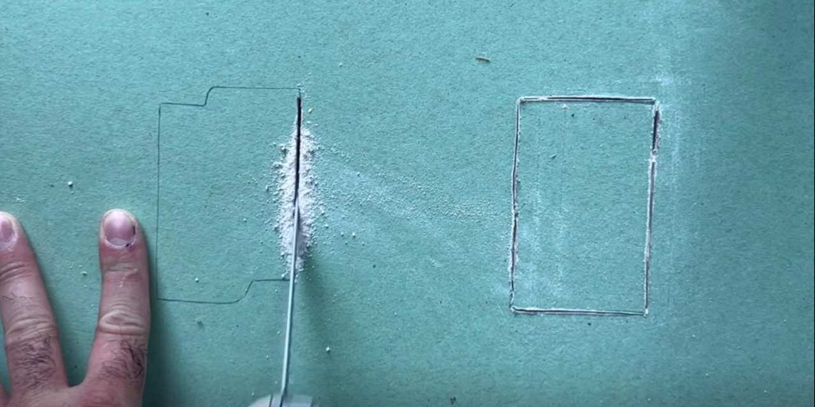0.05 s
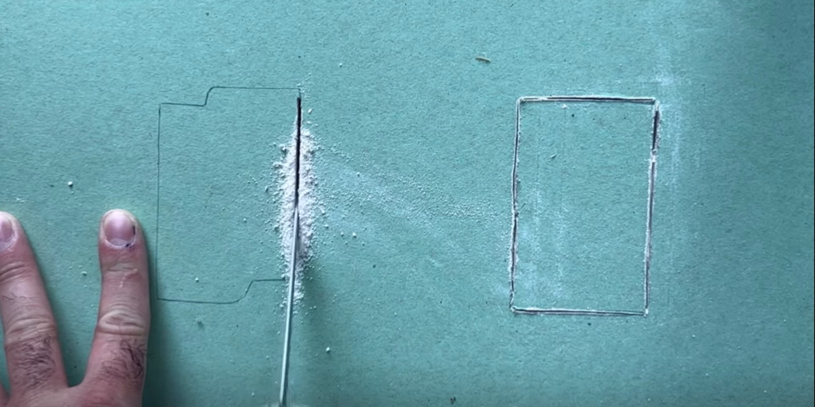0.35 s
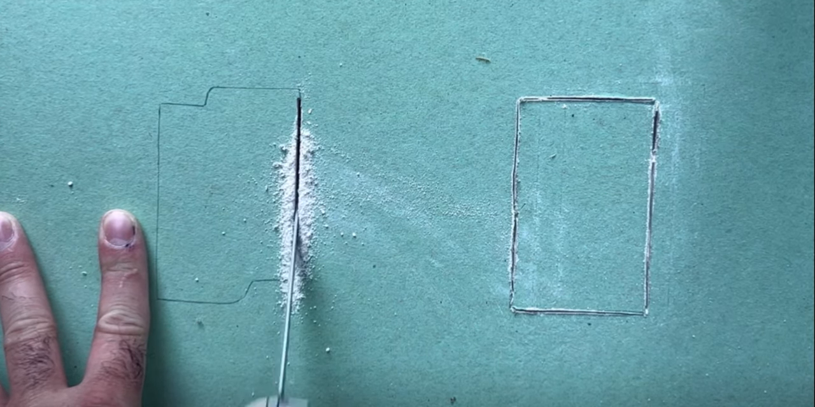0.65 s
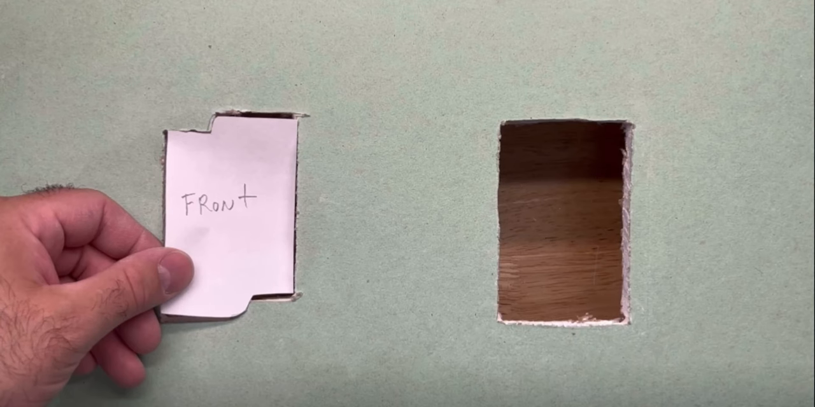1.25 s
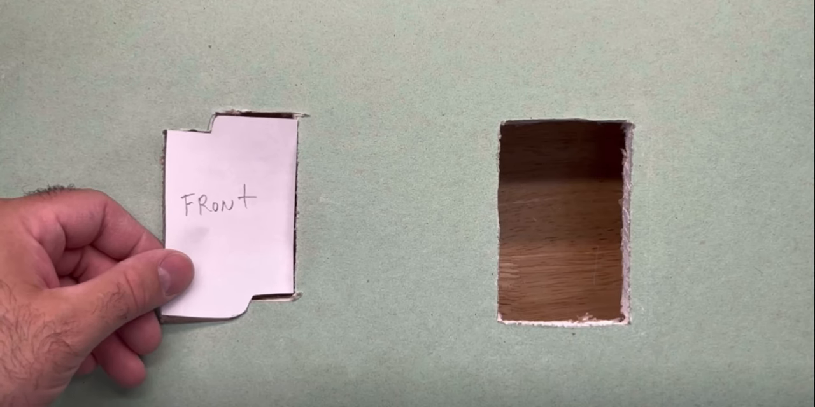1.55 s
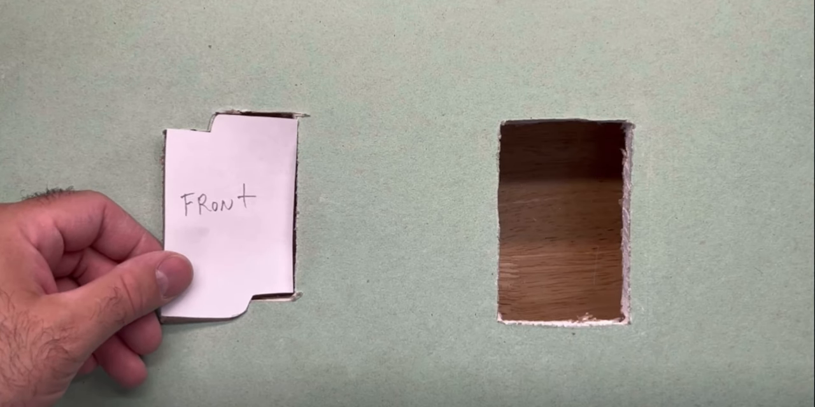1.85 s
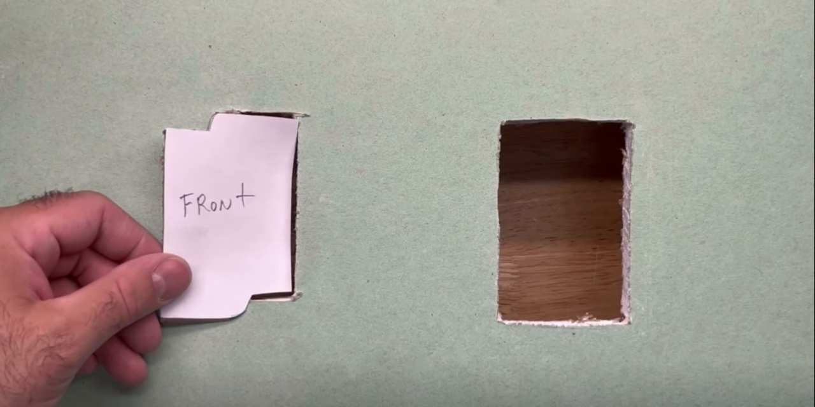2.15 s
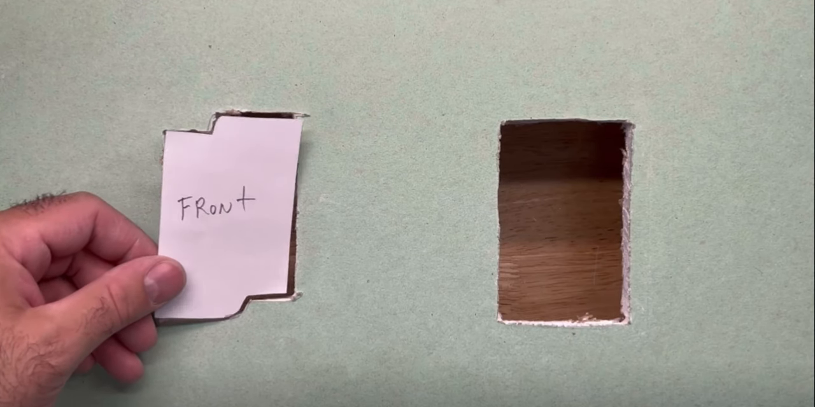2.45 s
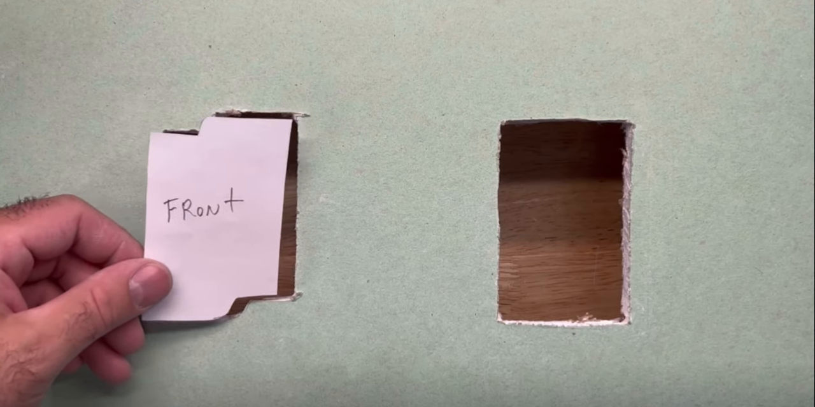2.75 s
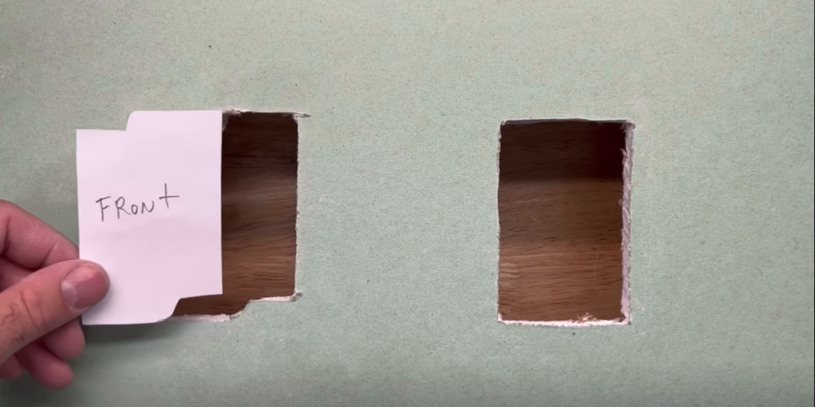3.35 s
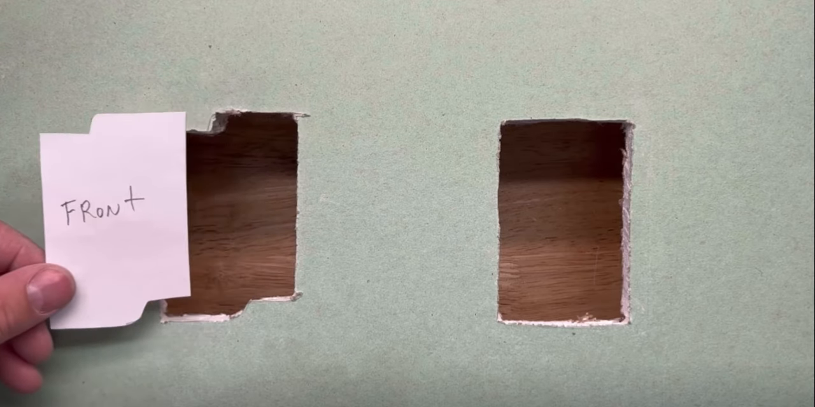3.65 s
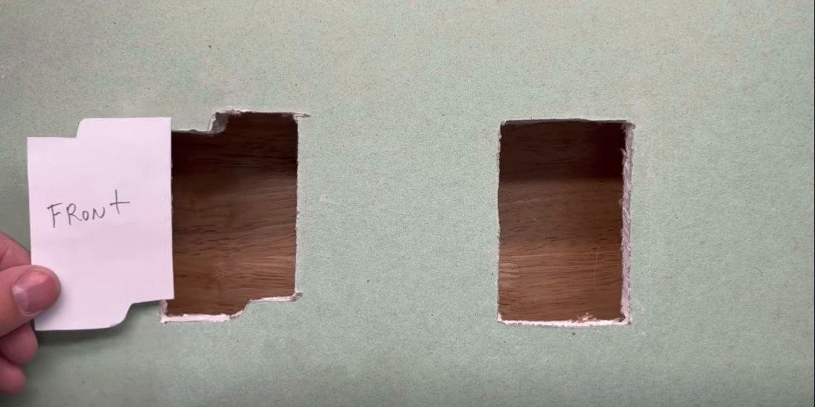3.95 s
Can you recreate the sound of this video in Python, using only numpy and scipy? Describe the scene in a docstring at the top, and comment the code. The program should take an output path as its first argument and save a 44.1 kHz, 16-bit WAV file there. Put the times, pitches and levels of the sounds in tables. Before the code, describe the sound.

A hand saw rasps through drywall in quick strokes, then stops, leaving faint paper rustles.

```python
"""A jab saw rasps through drywall in quick strokes, close by, hard on the push, light on the pull. Its teeth
crush gypsum, ring the blade and shake the board; now and then one snags and tears loose. The sawing cuts off
and the scene changes to a quiet room's low rush, hum and faint hiss. A finger bumps a paper template, which
rustles against the wall in clumps of tiny snaps."""
import sys
import numpy as np
from scipy import signal
from scipy.fft import rfft, irfft
from scipy.io import wavfile
from scipy.ndimage import uniform_filter1d

SR = 44100
rng = np.random.default_rng(int(sys.argv[2]) if len(sys.argv) > 2 else 0)


def persist_wave(psi):
    """Save psi, clipped to +-1, as 16-bit WAV."""
    counts = np.round(np.clip(psi, -1, 1) * 32767).astype(np.int16)
    wavfile.write(sys.argv[1], SR, np.atleast_2d(counts).T)


N = 176400
T = np.arange(N) / SR

# a pull, a little catch, then hard pushes and light pulls in turn
# (start [s], peak [s], end [s], rasp [dB], shake [dB], peakedness [-])
STROKES = [(-.04, 0.023, 0.069, -38.5, -23, 1.1), (.076, .088, 0.11, -45.5, -27.5, 0.66),
           (.11, 0.157, .23, -32, -16, 0.75), (.266, .338, .38, -40, -23.5, 0.49),
           (.387, 0.489, .533, -32, -14, 0.87), (.568, 0.636, .692, -43, -25.5, 0.46),
           (.7, .787, 0.82, -31.5, -15, 1.243), (.857, .925, 0.97, -40, -22, 0.96)]
# crushed gypsum (frequency [Hz], density [dB])
GYPSUM_SPECTRUM = [(20, -20), (50, -4), (90, 1), (300, 10), (420, 4.5), (680, 1.5), (880, 7.5), (950, -3),
                   (1120, 2.5), (1270, -5), (1800, 0.5), (2250, 2.5), (2480, -8), (2750, -3.5),
                   (3300, -4.5), (3780, -5), (3950, -14), (4150, -7), (5100, -12), (5650, -17.5),
                   (7500, -13.5), (9000, -16), (12000, -22), (15500, -20)]
# blade and board resonances (frequency [Hz], level [dB], t60 [s])
BLADE_MODES = [(1474, -3, .09), (1686, -7.5, .08), (1890, -7, 0.062), (2099.4, 2, 0.055), (2366, 0.5, .06),
               (2580, -1, .07), (2760, 2, .07), (2844, -0.5, .08), (3730, 0, 0.025), (4180, -2, 0.024),
               (4366, -4.5, 0.044), (5080, -8.5, .04), (7730, -10.5, 0.016), (9503, -6.5, .012)]
BOARD_MODES = [(120, -4.5, 0.13), (153, -1, 0.06), (180, 3, .09), (219, 1.5, 0.088), (237, -4, 0.087),
               (304.3, 0.5, 0.18), (313, -12.5, .07), (467, -20, .16), (541, -10.5, 0.12),
               (800, -19, 0.073), (857, -20.5, .16), (967, -22.5, 0.15), (1059, -14.5, .16)]
# handle rumble (frequency [Hz], density [dB])
RUMBLE_SPECTRUM = [(20, -34), (50, -16.5), (92, -17), (108, -9.5), (123, 3), (145, -4), (200, -15),
                   (400, -31), (2000, -68)]
# handle rumble (time [s], level [dB])
RUMBLE_ENVELOPE = [(0, -26.5), (.09, -32.5), (.22, -25), (.26, -44.5), (.31, -31.5), (.55, -30),
                   (.68, -26.5), (.71, -35), (.83, -29.5), (.86, -35.5)]
# teeth tearing loose (time [s], level [dB])
SNAGS = [(.146, -9.5), (.164, -10), (.205, -6.5), (.337, -18.5), (.465, -6), (.491, -6), (.503, -9),
         (.75, -15), (.782, -8.5), (.796, -7), (.893, -15)]
# room rush and microphone hiss (frequency [Hz], density [dB])
RUSH_SPECTRUM = [(20, -14.5), (35, -7.5), (52, 4.5), (72, 0.5), (100, 3), (135, -7.5), (200, -10),
                 (380, -15), (600, -24), (900, -20.5), (1400, -37), (2500, -50), (15000, -80.5)]
HISS_SPECTRUM = [(1000, 0.5), (2500, -1.5), (6000, -5), (10000, -11.5), (15000, -15.5)]
# room rush (time [s], level [dB])
RUSH_ENVELOPE = [(.95, -65), (1.2, -61), (1.55, -59), (3, -59), (4, -58.5)]
# finger bumps (time [s], level [dB])
BUMPS = [(1.455, -56), (1.49, -60), (2.195, -49), (2.226, -42.5), (2.24, -51), (2.279, -36), (2.293, -60),
         (2.314, -44), (2.331, -69), (3.309, -61.5)]
# resonances under the finger (frequency [Hz], level [dB], t60 [s])
BUMP_MODES = [(324, -14.5, 0.063), (380.8, -16, .08), (436.7, 0, 0.064), (491.6, 2.5, 0.085),
              (564, -10.5, 0.029), (713, -6, .04), (886.3, -26, .03)]
# paper crinkles (time [s], level [dB], decay [s])
CRINKLES = [(1.472, -57.5, .016), (1.486, -50, 0.009), (1.51, -67, .015), (1.54, -62, 0.017),
            (1.553, -67, 0.0082), (1.65, -75.5, 0.018), (1.706, -70, 0.05), (1.764, -56.5, 0.0089),
            (2.176, -70, .015), (2.19, -55.5, 0.02), (2.221, -45, 0.008), (2.268, -63.5, 0.022)]
# paper snaps (frequency [Hz], density [dB])
PAPER_SPECTRUM = [(60, -10), (250, -5), (450, 6), (700, 0), (1000, 2.5), (1400, -7.5), (1900, -5.5),
                  (2250, -2), (2700, -8.5), (4500, -11), (5100, -7), (5700, -11.5), (7300, -16.5),
                  (10000, -15.5), (15500, -23)]
# room decay (frequency [Hz], t60 [s])
ROOM_T60 = [(100, 0.15), (500, 0.17), (2000, .16), (6000, 0.084), (15000, 0.027)]
# left microphone's lead (frequency [Hz], phase [rad])
LEFT_LEAD = [(50, 0), (150, .06), (300, .14), (750, .35), (1100, .55), (1600, 2.1), (1850, .05), (5200, 0),
             (7200, -1.4), (8000, -3.14), (8800, -3.2), (11000, -6.28), (13000, -6.28), (14800, -9.4)]
# left over right (frequency [Hz], level [dB])
BALANCE = [(50, .2), (300, 1.2), (750, 0), (1100, 2), (1300, 0), (1800, -4), (2500, 0)]
# diffuse over shared sound at the microphones (frequency [Hz], level [dB])
SAW_DIFFUSE = [(50, -32), (400, -28), (750, -16), (1100, -14), (1300, -4), (1600, -6), (1850, -13),
               (2500, -22), (2900, -17), (4000, -34), (5200, -34), (5800, -7), (7400, -8), (8100, -28),
               (8700, -26), (9500, -5), (10500, -6), (11100, -30), (13000, -30), (13600, -3), (14800, -20)]
QUIET_DIFFUSE = [(90, -18), (200, -11), (400, -7.5), (700, -3.5), (1400, 3), (2100, -6.5), (3500, -3),
                 (7200, -2), (8100, -18), (8800, -14), (9800, -0.5), (11200, -14.5), (12900, -14.5),
                 (13700, -1.5), (14800, -11.5)]


def amp(db):
    """dB to gain."""
    return 10 ** (np.asarray(db) / 20)


def unit_rms(x):
    """Scales to rms 1."""
    return x / np.sqrt(np.mean(x ** 2) + 1e-20)


def lookup(table, hz):
    """Interpolates over log frequency."""
    table_hz, values = np.transpose(table)
    return np.interp(np.log(hz + 1), np.log(table_hz + 1), values)


def colour(x, spectrum):
    """Applies a spectrum; rms 1."""
    return unit_rms(irfft(rfft(x) * amp(lookup(spectrum, np.fft.rfftfreq(N, 1 / SR))), N))


def ring(x, modes):
    """Drives damped modes of total energy 1."""
    t = T[:SR // 2]
    response = sum(amp(db) * np.exp(-np.log(1000) * t / t60_s) * np.cos(2 * np.pi * hz * t)
                   for hz, db, t60_s in modes)
    return signal.fftconvolve(x, response / np.linalg.norm(response))[:N]


def fractures(per_s, spread_db=1.5):
    """Random tiny snaps of uneven size; rms 1."""
    snaps = (rng.random(N) < per_s / SR) * rng.choice([-1, 1], N)
    return unit_rms(snaps * amp(spread_db * np.minimum(rng.exponential(1, N), 4)))


def knocks(events, modes, contact_s):
    """Short pushes on a ringing body, each peaking at its level."""
    u = T / contact_s
    blow = ring(u * np.exp(-2 * u), modes)[:SR // 2]
    out = np.zeros(N)
    for time_s, db in events:
        span = out[round(time_s * SR):][:len(blow)]
        span += amp(db) * blow[:len(span)] / abs(blow).max()
    return out


def reverb(x):
    """Small-room reflections; treble dies first."""
    hz, t, noise = signal.stft(rng.standard_normal(SR // 2), SR, nperseg=256)
    decay = np.exp(-np.log(1000) * t / lookup(ROOM_T60, hz)[:, None])
    tail = signal.istft(noise * decay, SR, nperseg=256)[1]
    return signal.fftconvolve(x, tail / np.linalg.norm(tail))[:N]


def strokes():
    """Each stroke speeds up and slows; rasp and shake follow."""
    speed, rasp, shake = np.zeros((3, N))
    for start_s, peak_s, end_s, rasp_db, shake_db, peakedness in STROKES:
        arch = np.sin(np.pi / 2 * np.interp(T, [start_s, peak_s, end_s], [0, 1, 0]))
        speed += arch
        rasp += amp(rasp_db) * arch ** peakedness
        shake += amp(shake_db) * arch ** (1.5 * peakedness)
    return speed, rasp, shake


def tooth_hits(speed, nominal_hz=480, jitter=.6, spread_db=4):
    """One uneven impulse a tooth, denser at speed."""
    wobble = unit_rms(uniform_filter1d(rng.standard_normal(N), size=100))
    rate_hz = nominal_hz * (.5 + .5 * speed) * np.exp(jitter * wobble)
    hits = np.diff(np.floor(np.cumsum(rate_hz) / SR), prepend=0)
    return hits * amp(spread_db * rng.uniform(-1, 1, N))


def blade_slide(x, depth_db=3, width_hz=70, life_s=.018):
    """Narrow resonances in the rasp come and go as the blade slides."""
    hz, t, z = signal.stft(x, SR, nperseg=512, noverlap=384)
    across, along = np.fft.fftfreq(len(hz), hz[1])[:, None], np.fft.fftfreq(len(t), t[1])
    blur = np.exp(-2 * np.pi ** 2 * ((across * width_hz) ** 2 + (along * life_s) ** 2))
    patches = unit_rms(np.fft.ifft2(np.fft.fft2(rng.standard_normal(z.shape)) * blur).real)
    gain_db = depth_db * patches / np.sqrt(1 + (hz[:, None] / 9000) ** 2)
    return unit_rms(signal.istft(z * amp(gain_db), SR, nperseg=512, noverlap=384)[1][:N])


def gypsum_crunch(teeth, rasp, bite_s=.0015, bite_share=.36, snag_decay_s=.0022, idle_db=-57):
    """Teeth crush grit, which rings the blade; snags add bursts."""
    bites = unit_rms(signal.lfilter([1], [1, -np.exp(-1 / (bite_s * SR))], teeth))
    grit = unit_rms(fractures(per_s=14000) * (1 - bite_share + bite_share * bites))
    snags = sum(amp(db - 30.5) * (T > time_s) * np.exp(-abs(T - time_s) / snag_decay_s)
                for time_s, db in SNAGS)
    force = rasp + amp(idle_db) + snags
    gypsum = amp(-1.5) * blade_slide(colour(grit, GYPSUM_SPECTRUM)) * force
    blade = amp(-9.5) * ring(grit * force, BLADE_MODES)
    return gypsum + blade


def board_shake(teeth, shake, radiating_hz=(105, 1019)):
    """Teeth and snags drive the board's modes."""
    chatter = amp(-5.5) * ring(unit_rms(teeth * rng.choice([-1, 1], N)) * shake, BOARD_MODES)
    snags = knocks(SNAGS, BOARD_MODES, contact_s=.001)
    band = signal.butter(2, radiating_hz, "bandpass", fs=SR, output="sos")
    return signal.sosfilt(band, chatter + snags)


def handle_rumble():
    """The saw's handle and the hand rumble low under the moving blade."""
    level = amp(np.interp(T, *np.transpose(RUMBLE_ENVELOPE)))
    return level * colour(rng.standard_normal(N), RUMBLE_SPECTRUM)


def sawing(stop_s=.918, cutoff_s=.00073, reverb_db=-13):
    """Crunch, board and handle rumble; all cut off abruptly partway through a stroke."""
    speed, rasp, shake = strokes()
    teeth = tooth_hits(speed)
    crunch = gypsum_crunch(teeth, rasp)
    body = board_shake(teeth, shake) + handle_rumble()
    gate = np.exp(-np.maximum(T - stop_s, 0) / cutoff_s)
    return (crunch + amp(reverb_db) * reverb(crunch) + body) * gate


def room_tone(hum_hz=98.5, hum_max_db=-64.5, waver_rad=.64, hiss_db=-87.5):
    """Low rush of air and a wavering hum swell together over steady hiss."""
    below_5_hz = np.fft.rfftfreq(N, 1 / SR) < 5
    drift = unit_rms(irfft(rfft(rng.standard_normal(N)) * below_5_hz, N))
    hum = amp(hum_max_db) * np.sqrt(2) * np.sin(2 * np.pi * hum_hz * T + waver_rad * drift)
    hiss = amp(hiss_db) * colour(rng.standard_normal(N), HISS_SPECTRUM)
    level = amp(np.interp(T, *np.transpose(RUSH_ENVELOPE)))
    rush = level * colour(rng.standard_normal(N), RUSH_SPECTRUM)
    return rush + hum * level / level.max() + hiss


def finger_bumps():
    """A finger knocks the template on the wall."""
    return knocks(BUMPS, BUMP_MODES, contact_s=.0004)


def paper_rustle(rise_s=.0017):
    """The sheet crinkles in quick clumps of tiny snaps."""
    level = np.zeros(N)
    for time_s, db, decay_s in CRINKLES:
        age_s = np.maximum(T - time_s, 0)
        level += amp(db) * np.minimum(age_s / rise_s, 1) * np.exp(-age_s / decay_s)
    return level * colour(fractures(per_s=6900), PAPER_SPECTRUM)


def quiet_room(reverb_db=-8):
    """Finger and paper over the room tone."""
    handling = finger_bumps() + paper_rustle()
    return handling + amp(reverb_db) * reverb(handling) + room_tone()


def mic_pair(source, diffuse_table):
    """Two close microphones share one draw of a source; a second draw is the diffuse part."""
    hz = np.fft.rfftfreq(2 * N, 1 / SR)
    spread, lean = amp(lookup(diffuse_table, hz)), amp(lookup(BALANCE, hz) / 2)
    shared = rfft(source(), 2 * N)
    diffuse = 1j * spread * rfft(source(), 2 * N)
    left = (shared + diffuse) * lean
    right = (shared - diffuse) / lean * np.exp(-1j * lookup(LEFT_LEAD, hz))
    return irfft(np.array([left, right]) / np.sqrt(1 + spread ** 2), 2 * N)[:, :N]


def scene():
    """Close, narrow saw; wider quiet room."""
    return mic_pair(sawing, SAW_DIFFUSE) + mic_pair(quiet_room, QUIET_DIFFUSE)


def record(dry):
    """Low-pass at 15.7 kHz."""
    lowpass = signal.firwin(511, 15700, window=("kaiser", 9), fs=SR)
    return signal.oaconvolve(dry, lowpass[None], "same")


dry = scene()
out = record(dry)
persist_wave(out)
```